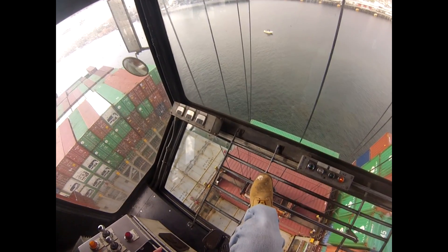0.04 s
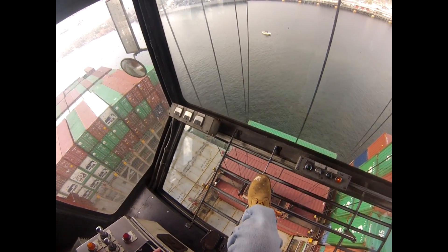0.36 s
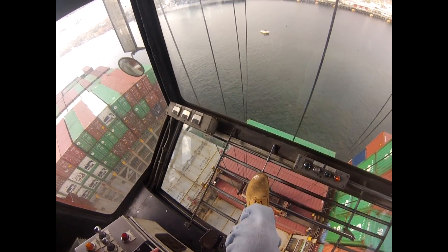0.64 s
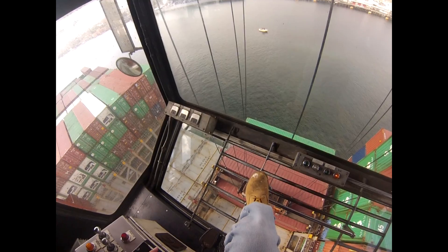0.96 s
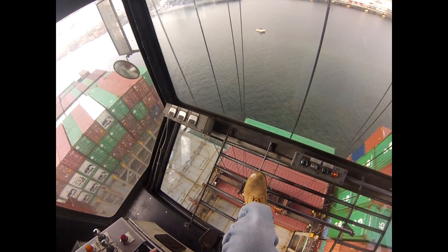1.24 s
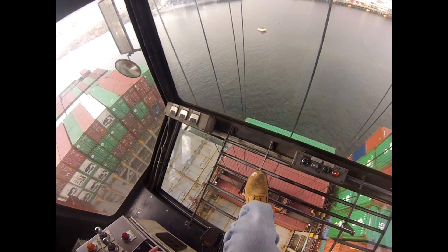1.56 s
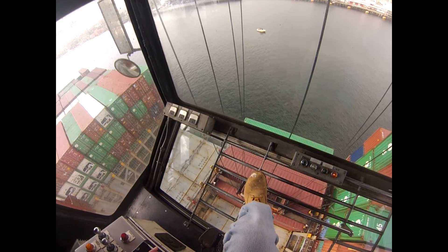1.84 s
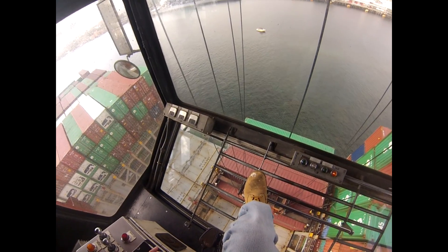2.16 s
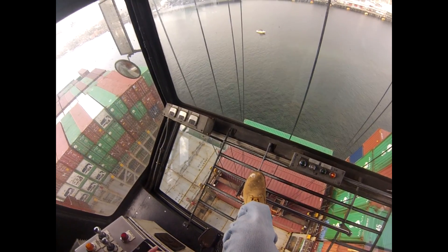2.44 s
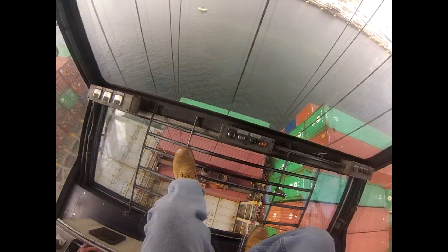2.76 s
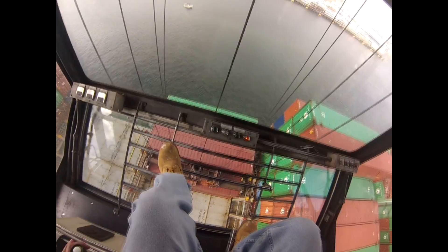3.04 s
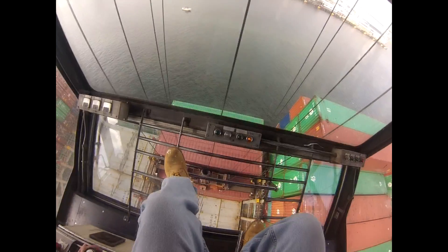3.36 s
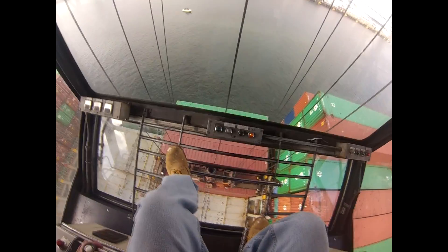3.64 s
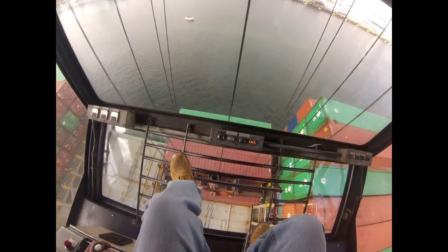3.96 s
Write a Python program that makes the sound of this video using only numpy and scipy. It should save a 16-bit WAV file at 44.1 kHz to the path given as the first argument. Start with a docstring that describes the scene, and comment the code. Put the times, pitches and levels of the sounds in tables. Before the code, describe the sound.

A crane cab hums with faint motor tones and soft low thuds, then starts moving with a louder rumble, scraping, brief creaks and bursts of bright rattling. It is heard from inside through a hollow-sounding microphone.

```python
"""Container crane cab

Machinery hums over a deep, lumpy rumble. At about 2.4 s the cab swings into motion: the rumble
swells, panels drone, surfaces scrape, joints creak and loose fittings rattle in short bursts.
All is heard, almost in mono, through a small hard microphone case with hollow resonances."""
import sys
import numpy as np
from scipy import signal
from scipy.fft import rfft, irfft
from scipy.io import wavfile

SR = 44100
rng = np.random.default_rng(int(sys.argv[2]) if len(sys.argv) > 2 else 0)


def transcribe(signal):
    """Save signal, clipped to [-1, 1], as a 16-bit WAV file at the path in sys.argv[1]."""
    frames = np.atleast_2d(signal).T
    limited = np.clip(frames, -1, 1)
    pcm = np.round(limited * 32767).astype(np.int16)
    wavfile.write(sys.argv[1], SR, pcm)


N = 176400
TIME_S = np.arange(N) / SR
FREQ_HZ = np.maximum(np.arange(N // 2 + 1) * SR / N, 1)

# microphone hiss, common to both channels: f/Hz, density/dB
HISS_MID_SPECTRUM = [(3000, -102), (6000, -103.5), (15000, -108.5)]
# faint high hiss, opposite in the two channels: f/Hz, density/dB
HISS_SIDE_SPECTRUM = [(1300, -124), (4000, -112.5), (10000, -112), (15000, -121)]
# peaks and dips of the microphone case: f/Hz, width/Hz, gain/dB
CASE_RESONANCES = [(1281, 107, 8), (1495, 37, 1.5), (1639, 75, 4.5), (1882, 274, -6), (2188, 210, 7.5),
                   (2460, 480, 5.5), (2765, 100, -6), (2930, 67, 3.5), (3470, 160, 6), (4034, 270, 7.5),
                   (4800, 250, 6), (5420, 310, 7), (5900, 410, -1), (6880, 850, 6), (8150, 200, 5)]
# idle machinery and ventilation: f/Hz, density/dB
MACHINERY_SPECTRUM = [(90, -78), (160, -78.5), (300, -85), (620, -88.5), (1000, -91.5), (1800, -92),
                      (2500, -97.5), (3500, -106), (7000, -113), (15000, -120)]
# motor and fan tones: f/Hz, level/dB
MOTOR_TONES = [(468.3, -69), (904, -79.5), (1324, -79.5), (1432, -73.5), (1588, -80.5), (1868, -74),
               (2067, -77), (2336, -82.5)]
# shaking of the structure: f/Hz, density/dB
RUMBLE_SPECTRUM = [(10, -63), (21, -51.5), (36, -65), (50, -61.5), (70, -74), (100, -87), (200, -108)]
# swell of the shaking: t/s, level/dB
RUMBLE_ENVELOPE = [(2.47, 0), (2.68, 9), (3.2, 9.5), (3.65, 4.5)]
# jolts of the cab: t/s, level/dB, f/Hz
JOLTS = [(0.156, -32, 36), (.322, -31.5, 37.7), (0.689, -35, 37.3), (0.849, -34, 40), (.912, -31, 34),
         (1.41, -38.5, 43.5), (1.6, -35, 40), (1.675, -41, 42), (2.112, -33.5, 41.6), (2.209, -37.5, 37.8),
         (2.337, -29.5, 38), (2.686, -20.5, 33.2), (2.746, -24, 28), (2.965, -29, 27.6), (3.425, -26, 55.7),
         (3.559, -25, 30), (3.751, -22.5, 25.2), (3.87, -19, 32.5)]
# broad part of the panel drone: f/Hz, density/dB
DRONE_SPECTRUM = [(40, -71), (68, -57.5), (95, -67.5), (170, -65), (300, -70), (450, -70.5), (800, -77),
                  (1200, -75), (2500, -100)]
# panel resonances: f/Hz, half-width/Hz, level/dB
PANEL_MODES = [(163, 13, -49.5), (228, 7.3, -45), (267, 6, -45), (449, 5.6, -59.5)]
# swell of the panel drone: t/s, level/dB
DRONE_ENVELOPE = [(2.35, -30), (2.47, -11), (2.54, -1), (2.65, -0.5), (2.94, 1.5), (3.1, -1), (3.45, -5),
                  (3.7, -10)]
# creaking joints: centre t/s, length/s, f/Hz, level/dB
JOINT_SLIPS = [(1.70, 0.11, 2270, -62), (2.41, 0.069, 2450, -58), (3.09, 0.027, 1280, -41),
               (3.645, 0.06, 2230, -50.5), (3.617, 0.036, 6700, -57)]
# rubbing surfaces: f/Hz, density/dB
SCRAPE_SPECTRUM = [(200, -78.5), (500, -76.5), (1000, -71), (1500, -69.5), (2400, -71.5), (3200, -81.5),
                   (5000, -87.5), (8000, -90), (9300, -100), (15000, -110)]
# rubbing force: t/s, level/dB
SCRAPE_FORCE = [(2.3, -42), (2.42, -20.5), (2.48, -12.5), (2.52, -5), (2.62, .5), (2.7, 1.5), (2.75, -2),
                (2.96, -2), (3.08, -7), (3.26, -11), (3.39, -2), (3.5, -8), (3.6, -7.5), (3.72, -13.5),
                (3.83, -12), (3.89, -4), (3.94, -12)]
# touches of loose fittings: f/Hz, density/dB
RATTLE_SPECTRUM = [(500, -103), (1200, -73.5), (2500, -78.5), (4000, -80.5), (5300, -77), (8200, -81.5),
                   (9500, -85), (12000, -88.5), (15000, -100)]
# rattle bursts: t/s, level/dB, t60/s, tilt/(dB per octave), ring f/Hz, ring gain/dB
RATTLE_BURSTS = [(2.797, -9, 0.67, -1.5, 8200, 4), (2.843, -3, .32, -1.5, 5450, 3),
                 (2.933, -2.5, 0.31, -2, 4700, 5), (2.983, -4.5, 0.34, -0.5, 5020, 9),
                 (3.168, -17.5, 0.64, -1, 7000, 1), (3.299, -15, 0.47, 2, 5080, 18),
                 (3.427, -6, 0.32, 1, 6730, 4.5), (3.526, -4, 0.58, -0.5, 5100, 6),
                 (3.729, -7.5, 0.28, 1, 5200, 3), (3.785, -3, 0.35, -3, 8320, 16)]


def from_db(db):
    """Decibels to gain."""
    return 10 ** (np.asarray(db) / 20)


def rms_one(x):
    """Scale to rms 1."""
    return x / np.sqrt(np.mean(x ** 2) + 1e-20)


def white():
    """White noise, rms 1."""
    return rng.standard_normal(N)


def level(points):
    """Gain over time from (t/s, level/dB) points."""
    t_s, db = np.transpose(points)
    return from_db(np.interp(TIME_S, t_s, db))


def ramp(start_s, length_s):
    """Linear rise from 0 to 1."""
    return np.clip((TIME_S - start_s) / length_s, 0, 1)


def colour(x, spectrum, tilt_db_per_oct=0, pivot_hz=6000):
    """Shape white input of rms 1 to a spectral density, with optional tilt."""
    hz, db = np.transpose(spectrum)
    density_db = np.interp(np.log(FREQ_HZ), np.log(hz), db)
    octaves = np.log2(np.maximum(FREQ_HZ, hz[0]) / pivot_hz)
    return irfft(rfft(x) * from_db(density_db + tilt_db_per_oct * octaves), N) * np.sqrt(SR / 2)


def pass_filter(x, kind, corner_hz):
    """Second-order low-pass or high-pass."""
    return signal.sosfilt(signal.butter(2, corner_hz, kind, fs=SR, output="sos"), x)


def peak(x, hz, width_hz, gain_db):
    """One resonance or dip."""
    gain = from_db(gain_db / 2)
    alpha = np.pi * width_hz / SR
    tuning = -2 * np.cos(2 * np.pi * hz / SR)
    zeros = [1 + alpha * gain, tuning, 1 - alpha * gain]
    poles = [1 + alpha / gain, tuning, 1 - alpha / gain]
    return signal.lfilter(zeros, poles, x)


def ring(hz, half_width_hz):
    """Noise-driven resonance, rms 1."""
    return rms_one(irfft(rfft(white()) / (1 + ((FREQ_HZ - hz) / half_width_hz) ** 2), N))


def drift(rate_hz):
    """Slow random motion, rms 1."""
    return ring(0, rate_hz)


def contacts(per_s, spread_db):
    """Tiny impulses at random times, rms 1."""
    sizes = from_db(spread_db * np.minimum(rng.exponential(1, N), 5)) * np.sign(white())
    return rms_one(sizes * (rng.random(N) < per_s / SR))


def microphone_case(x):
    """The hollow case colours the sound with a chain of peaks and dips."""
    for hz, width_hz, gain_db in CASE_RESONANCES:
        x = peak(x, hz, width_hz, gain_db)
    return x


def cab_reflections(x, t60_s=0.11, wet_db=-11.5):
    """Add short, dense reflections off the glass walls; bass escapes through them."""
    tail = pass_filter(white() * from_db(-60 * TIME_S / t60_s), "high", corner_hz=590)
    return x + from_db(wet_db) * signal.fftconvolve(x, tail / np.linalg.norm(tail))[:N]


def machinery():
    """Steady rush of idle machinery and ventilation."""
    return colour(white(), MACHINERY_SPECTRUM)


def motors(wander_hz=0.56, waver_db=1):
    """Motors and fans sing on steady tones, wavering slightly in pitch and level."""
    out = 0
    for hz, db in MOTOR_TONES:
        phase = 2 * np.pi * np.cumsum(hz + wander_hz * drift(rate_hz=2)) / SR
        out += from_db(db + waver_db * drift(rate_hz=2)) * rms_one(np.sin(phase))
    return out


def rumble(lurch_db=0.5):
    """The structure shakes unevenly, harder once the cab moves."""
    shaking = pass_filter(colour(white(), RUMBLE_SPECTRUM), "low", corner_hz=200)
    return shaking * level(RUMBLE_ENVELOPE) * from_db(lurch_db * drift(rate_hz=15))


def jolts(rise_s=0.016):
    """Each jolt rocks the cab for a cycle or two."""
    out = 0
    for start_s, db, hz in JOLTS:
        age_s = np.maximum(TIME_S - start_s, 0)
        envelope = (age_s / rise_s * np.exp(1 - age_s / rise_s)) ** 2
        out += from_db(db) * envelope * np.sin(2 * np.pi * hz * age_s)
    return out


def panel_drone():
    """Motion shakes the panels; their resonances build up a little later."""
    broad = pass_filter(colour(white(), DRONE_SPECTRUM), "low", corner_hz=2500)
    modes = sum(from_db(db) * ring(hz, half_width_hz) for hz, half_width_hz, db in PANEL_MODES)
    return level(DRONE_ENVELOPE) * (broad + modes * ramp(start_s=2.8, length_s=0.125))


def creaks():
    """A joint slips and sings briefly at one rough pitch."""
    out = 0
    for centre_s, length_s, hz, db in JOINT_SLIPS:
        envelope = np.sin(np.pi * ramp(centre_s - length_s / 2, length_s))
        out += from_db(db) * envelope * ring(hz, half_width_hz=110)
    return out


def scrape(flutter_db=1, treble_hz=3120, brightening=0.034):
    """Rubbing surfaces: dense slips, louder and slightly brighter under more force."""
    slips = contacts(per_s=4500, spread_db=1) * from_db(flutter_db * drift(rate_hz=25))
    friction = colour(slips, SCRAPE_SPECTRUM)
    treble = irfft(rfft(friction) / (1 + (treble_hz / FREQ_HZ) ** 8), N)
    force = level(SCRAPE_FORCE)
    return force * (friction - treble + treble * force ** brightening)


def rattles(attack_s=0.0068):
    """Each loose fitting gives a bright, fast-dying shower of touches with its own ring."""
    out = 0
    for start_s, db, t60_s, tilt_db_per_oct, ring_hz, ring_db in RATTLE_BURSTS:
        decay_db = 60 * np.maximum(TIME_S - start_s - attack_s, 0) / t60_s
        envelope = ramp(start_s, attack_s) * from_db(db - decay_db)
        touches = envelope * contacts(per_s=5000, spread_db=0)
        burst = colour(touches, RATTLE_SPECTRUM, tilt_db_per_oct)
        out += peak(burst, ring_hz, width_hz=250, gain_db=ring_db)
    return out


def scene():
    """Motor tones plus the reflected sources, through the case, alike in both channels."""
    tones = motors()
    sources = machinery() + rumble() + jolts() + panel_drone() + scrape() + creaks() + rattles()
    return microphone_case(tones + cab_reflections(sources)) * np.ones((2, 1))


def record(dry, cutoff_hz=15250):
    """Add faint mid and side hiss, then a steep low-pass."""
    mid = colour(white(), HISS_MID_SPECTRUM)
    side = colour(white(), HISS_SIDE_SPECTRUM) * np.array([[1], [-1]])
    return irfft(rfft(dry + mid + side) / np.sqrt(1 + (FREQ_HZ / cutoff_hz) ** 900), N)


dry = scene()
out = record(dry)
transcribe(out)
```